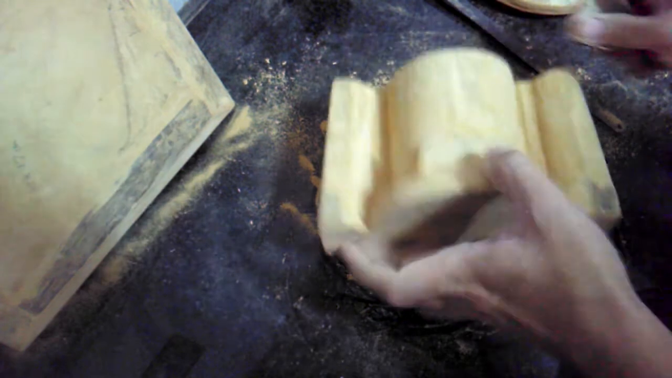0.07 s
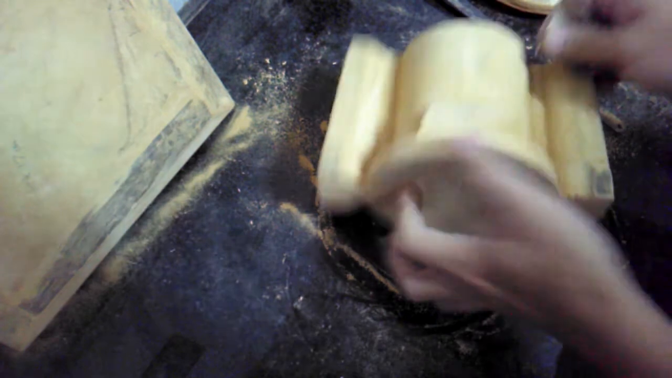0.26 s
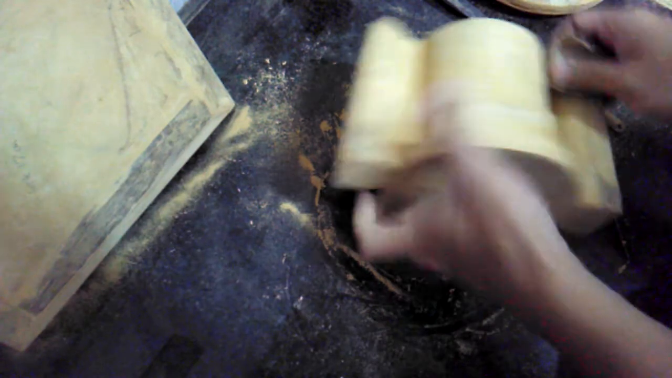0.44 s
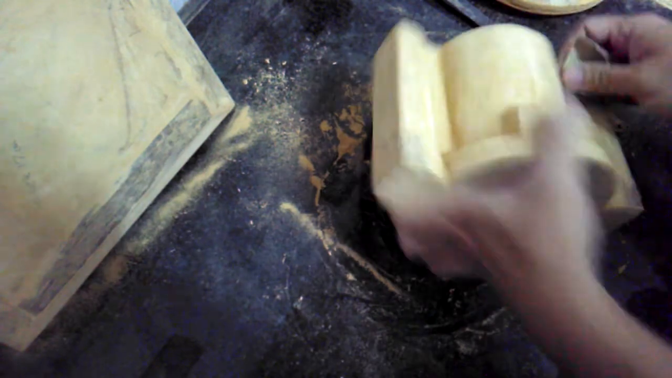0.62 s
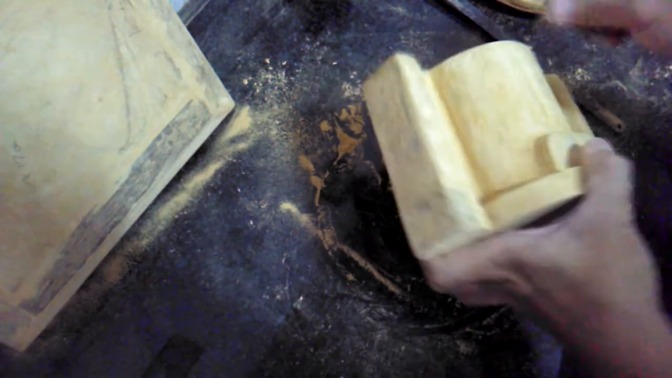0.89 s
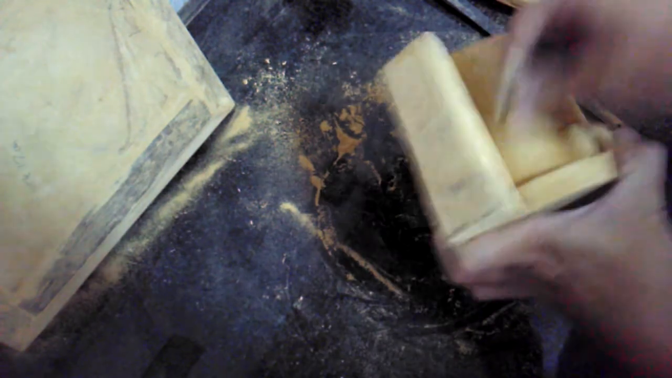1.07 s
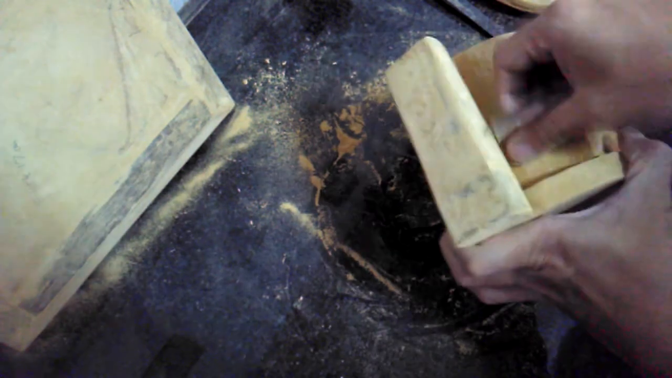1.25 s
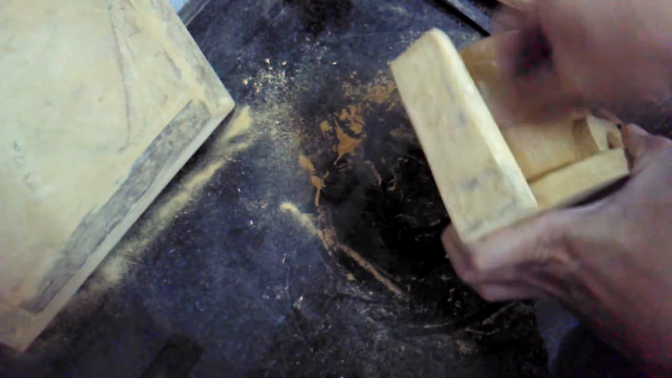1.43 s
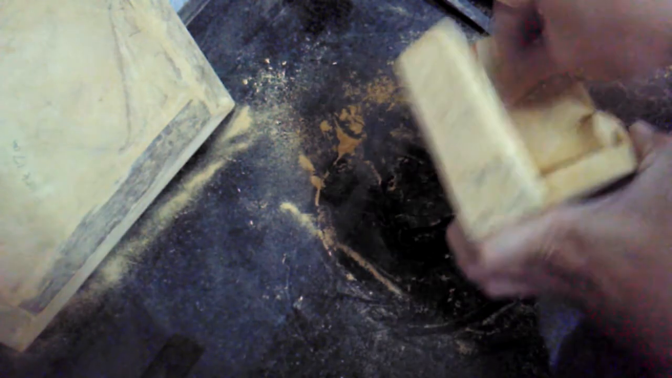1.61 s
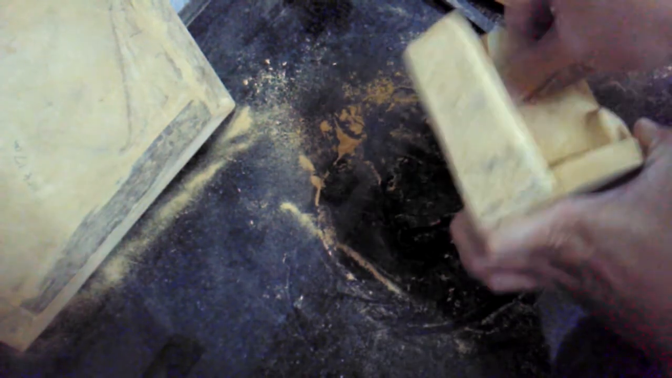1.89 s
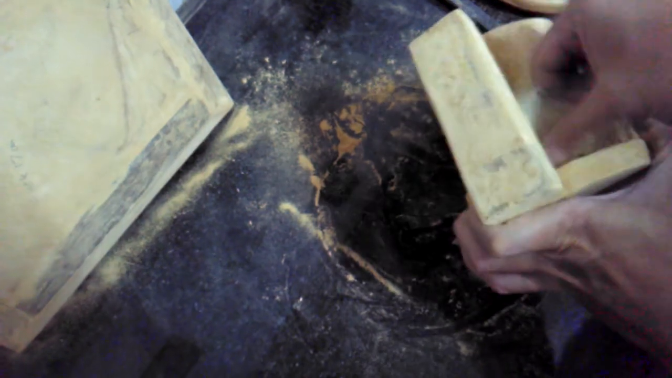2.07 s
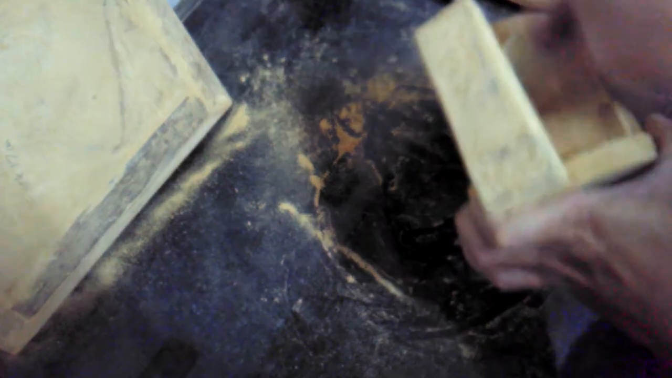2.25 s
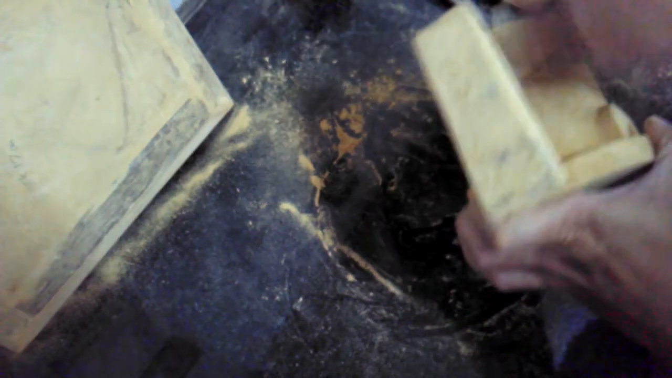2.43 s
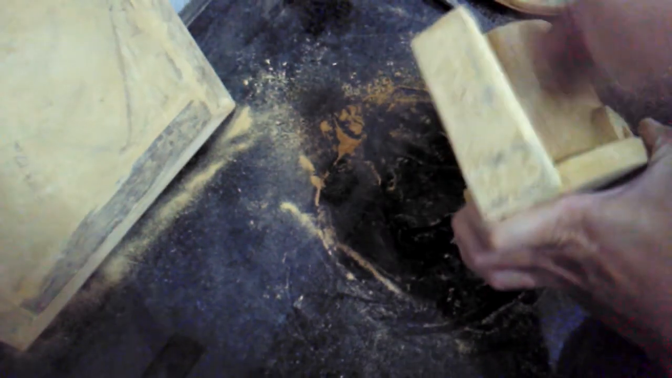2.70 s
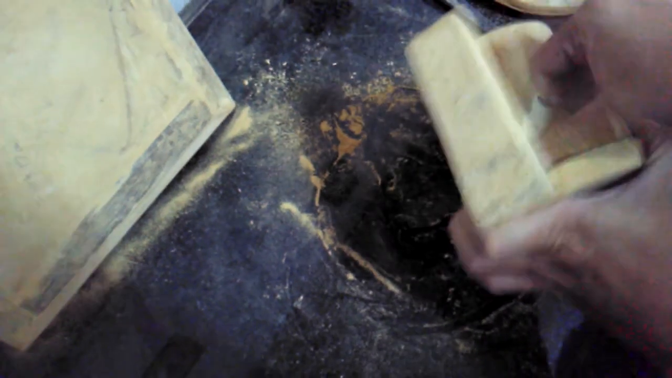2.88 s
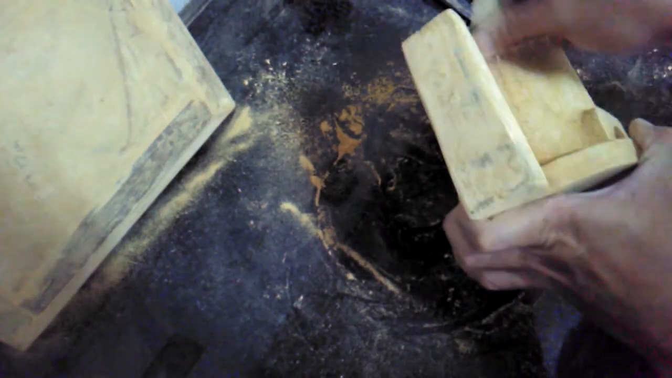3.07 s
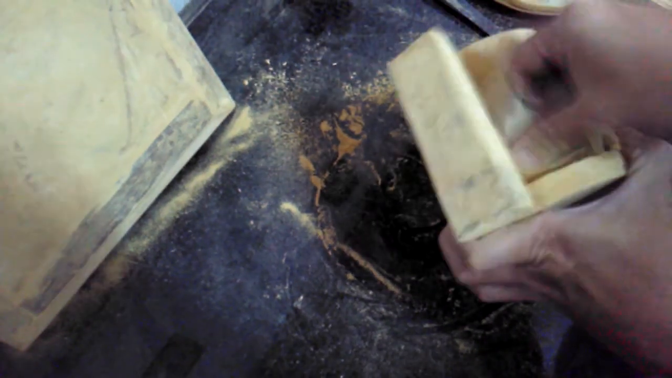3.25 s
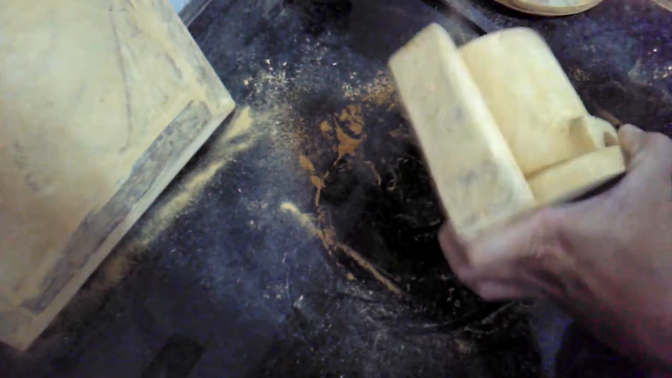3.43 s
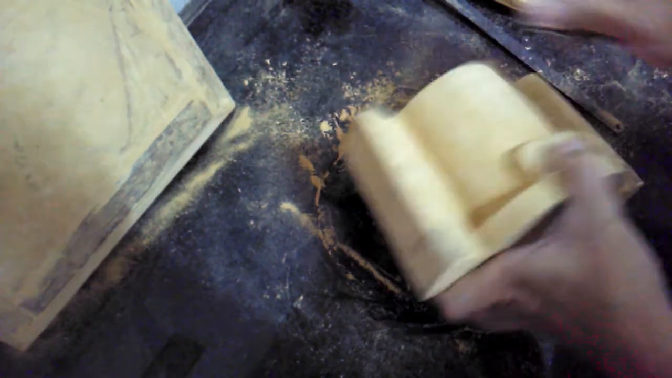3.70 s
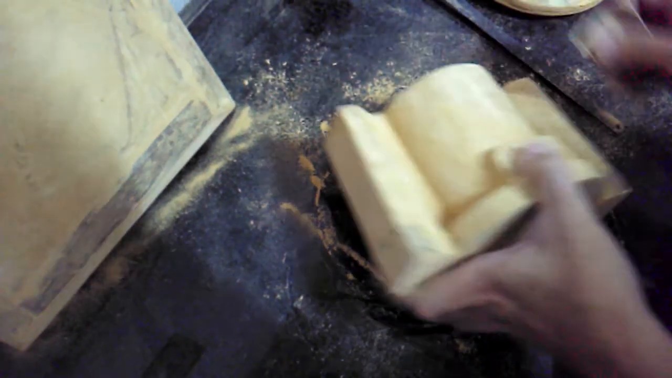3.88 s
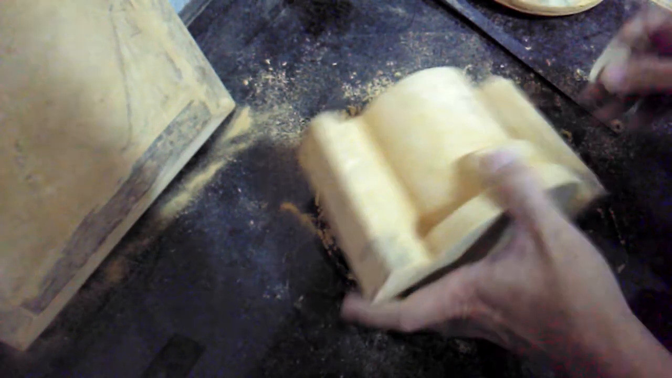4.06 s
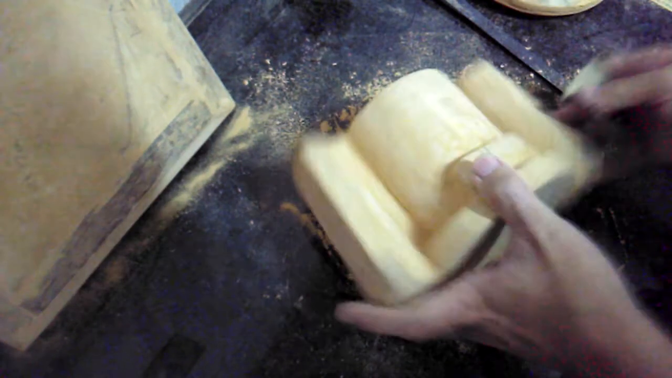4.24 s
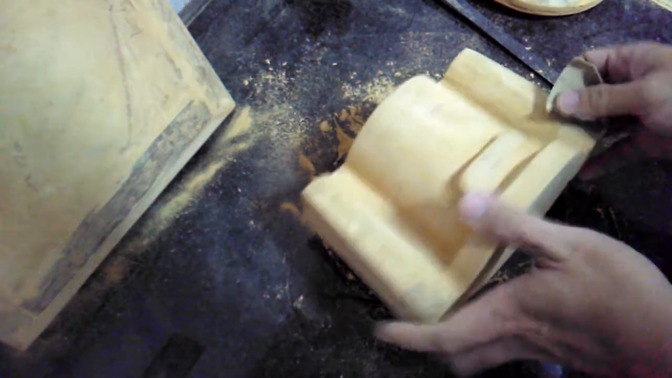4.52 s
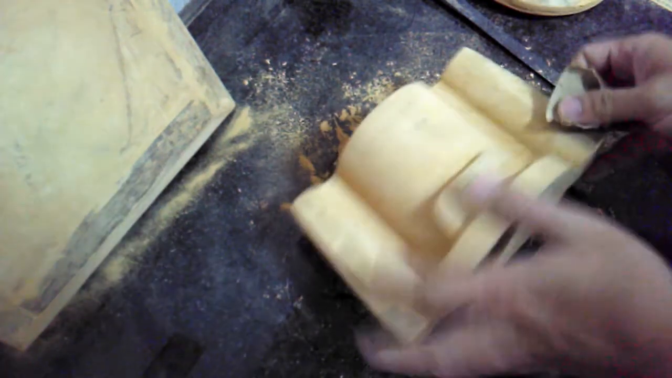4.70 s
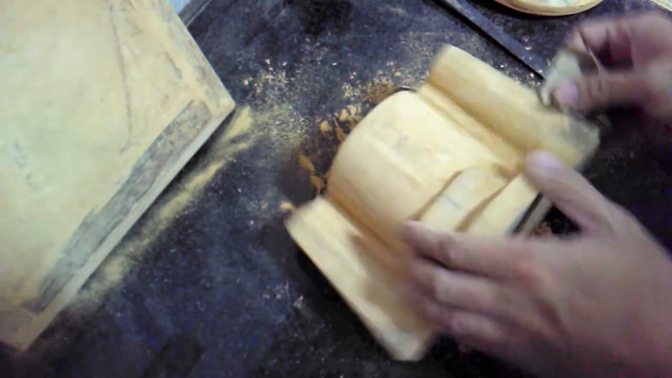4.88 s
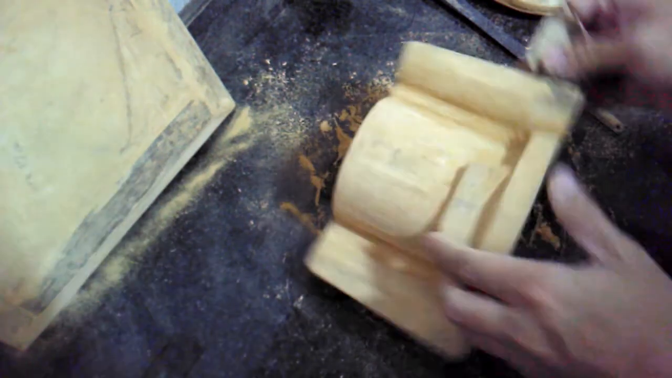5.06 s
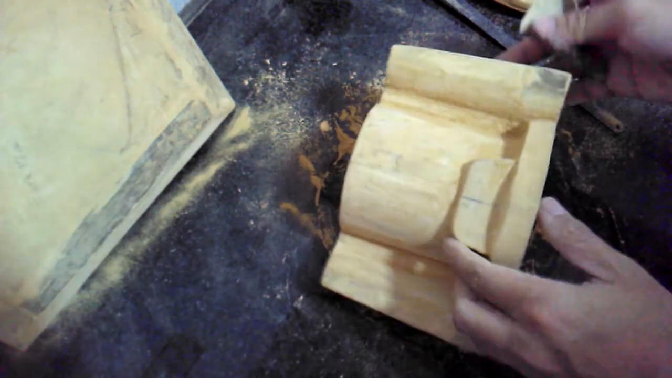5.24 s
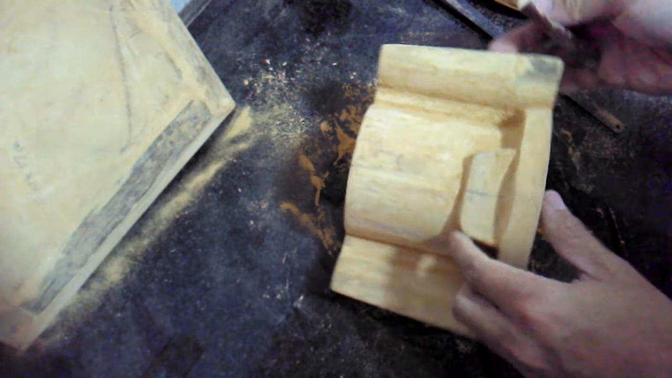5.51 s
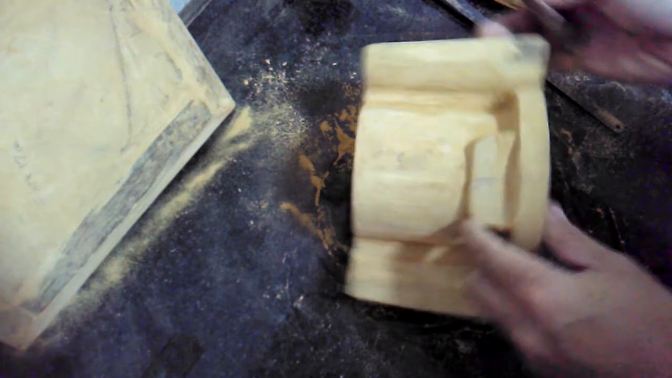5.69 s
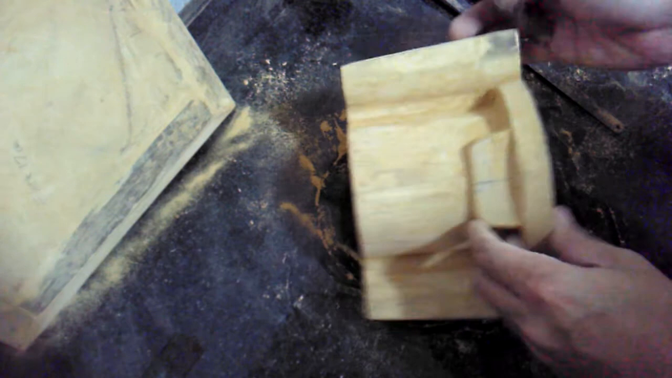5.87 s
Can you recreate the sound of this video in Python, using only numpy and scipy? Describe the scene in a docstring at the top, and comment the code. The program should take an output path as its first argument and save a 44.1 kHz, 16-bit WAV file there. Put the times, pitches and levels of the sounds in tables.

```python
"""At the bench a hollow wooden pattern is turned over: light rubs, and blunt knocks that ring wood and bench.
Paper snaps off an edge, then sixteen quick hand strokes rasp with grit, echoing off the wall of the hollow.
A last hard snap follows; the piece is set down and shifted with soft knocks and palm rubs as a faint drone swells.
A small workshop answers, over low rumble and hiss. The sound is close and almost central, with the scratch
and hiss spread a little in the treble."""
import sys
import numpy as np
from scipy import signal
from scipy.fft import rfft, irfft, next_fast_len
from scipy.io import wavfile
from scipy.ndimage import map_coordinates

SR = 44100
rng = np.random.default_rng(int(sys.argv[2]) if len(sys.argv) > 2 else 0)


def bounce(signal):
    """Save signal as a 16-bit WAV file at the path given by the first command-line argument."""
    frames = np.transpose(np.atleast_2d(signal))
    limited = np.clip(frames, -1, 1)
    pcm = np.round(limited * 32767).astype(np.int16)
    wavfile.write(sys.argv[1], SR, pcm)


N = 261495
TIME = np.arange(N) / SR  # seconds

# Sanding strokes, push and pull in turn. Each row: start in seconds, length in seconds,
# place of top speed from 0 to 1, gain in dB, wood under the rasp in dB.
STROKES = [(1.214, 0.084, 0.31, -59, 10.5), (1.383, 0.08, 0.4, -50.5, 5.5), (1.516, 0.078, 0.69, -42.5, 4),
           (1.644, .11, 0.45, -46.5, 3), (1.787, 0.1, 0.41, -44, 5), (1.915, .093, .55, -49, 6.5),
           (2.052, 0.084, 0.62, -42.5, 4), (2.17, 0.099, 0.65, -48, 5.5), (2.341, .074, 0.6, -44, 4.5),
           (2.459, 0.1, 0.6, -46, 5), (2.627, 0.11, 0.59, -42.5, 7.5), (2.758, .11, 0.59, -46, 7),
           (2.909, 0.094, 0.57, -41, 2), (3.036, 0.14, 0.47, -43.5, 5.5), (3.202, 0.13, 0.54, -40.5, -3),
           (3.356, 0.12, 0.71, -40.5, 1)]
# Grit on wood as the hand pushes. Each row: frequency in Hz, relative level in dB per Hz.
PUSH_TONE = [(350, -54), (600, -29.5), (905, -20.5), (1120, -20.5), (1350, -17), (1950, -10), (2320, -10),
             (3370, -7.5), (3790, -0.5), (4160, -5), (4880, -1), (7080, -14), (7660, -19), (12700, -25),
             (14300, -33)]
# Grit on wood as the hand pulls. Each row: frequency in Hz, relative level in dB per Hz.
PULL_TONE = [(350, -19.5), (600, -24.5), (1090, -11), (1180, -13), (1930, -9), (2290, -6.5), (2620, -7),
             (2910, 0), (3500, -4), (3790, 0.5), (4220, -1.5), (4950, 1), (6890, -12), (12900, -21),
             (14300, -28)]
# Resonances of the piece under the paper. Each row: frequency in Hz, width in Hz, lift in dB.
WALL_RESONANCES = [(1227, 45, 1), (2326, 320, 6), (3000, 220, 3.5), (3680, 180, -1.5), (4330, 260, -1.5),
                   (4840, 130, 3.5)]
# The paper catches and snaps. Each row: start in seconds, gain in dB, t60 in seconds, wood body in dB.
SNAPS = [(1.0064, -45, 0.044, -19), (1.023, -51.5, 0.14, -19), (1.643, -43, 0.044, -20),
         (3.4527, -29, 0.039, 0.5), (3.574, -59, 0.033, -12), (4.4423, -59, 0.18, -9)]
# The flick of the paper itself. Each row: frequency in Hz, relative level in dB per Hz.
SNAP_TONE = [(600, -23), (1700, -12), (2500, 5), (3100, -8), (3800, -19), (4500, -7), (5200, -0.5),
             (5900, -20), (6600, -15.5), (8000, -28.5), (14000, -30)]
# The hollow wood under a snap. Each row: frequency in Hz, relative level in dB per Hz.
HOLLOW_TONE = [(400, -19.5), (700, -14), (1050, -2.5), (1400, -3.5), (1850, 2), (2500, 1), (3200, -3.5),
               (5000, -26)]
# The piece meets the bench. Each row: start in seconds, gain of the piece in dB,
# contact bandwidth in Hz, gain of the bench in dB.
KNOCKS = [(.002, -59, 745, -58.5), (.6225, -44.5, 466, -46), (0.636, -44, 270, -52),
          (0.656, -59, 800, -47.5), (0.673, -68, 600, -59), (0.6954, -40.5, 660, -46.5),
          (.816, -29, 860, -30.5), (0.8272, -35, 640, -41), (3.8366, -47, 414, -78),
          (4.148, -40, 367, -52.5), (5.067, -43.5, 473, -45), (5.092, -47, 343, -50.5),
          (5.1237, -45, 357, -50.5)]
# Modes of the piece. Each row: frequency in Hz, relative level in dB, t60 in seconds.
WOOD_MODES = [(169.5, -5, .15), (219, 5.5, 0.02), (265, -0.5, 0.1), (329.3, -1, 0.12), (360.9, -6.5, 0.32),
              (407.2, -4, 0.25), (472, 1, 0.084), (529, -10.5, 0.27), (640, -2.5, 0.15), (720, -6, 0.15),
              (790, -12, 0.15), (888, 2, 0.048), (1015, -17.5, 0.059), (1160, -17, 0.32)]
# Modes of the bench top. Each row: frequency in Hz, relative level in dB, t60 in seconds.
BENCH_MODES = [(72.6, 8.5, 0.24), (94.4, -26, .14), (134, 11, 0.092)]
# Dust crushed by a blow. Each row: frequency in Hz, relative level in dB per Hz.
CRUNCH_TONE = [(420, 13), (820, 14), (1120, 13.5), (1380, 4.5), (2050, -2.5), (2950, -5.5), (3750, -15),
               (5100, -12.5), (6400, -32), (13500, -37)]
# Light rubs in handling. Each row: start in seconds, length in seconds,
# gain in dB before the common trim, what rubs.
RUBS = [(.025, .19, -69.5, "paper"), (0.217, .065, -55, "paper"), (.3, 0.087, -71, "paper"),
        (.652, 0.014, -67.5, "slide"), (3.5, 0.061, -66.5, "paper"), (4.113, 0.028, -69.5, "palm"),
        (4.258, 0.057, -70, "palm"), (4.425, 0.049, -68, "palm"), (4.525, .28, -71.5, "palm"),
        (4.61, .03, -69.5, "palm"), (4.809, 0.062, -57.5, "palm"), (4.97, 0.055, -72.5, "palm"),
        (5.674, 0.12, -62.5, "slide")]
# Rustle of the held paper. Each row: frequency in Hz, relative level in dB per Hz.
PAPER_TONE = [(590, -66.5), (1000, -25), (1670, -2.5), (1920, -18), (2260, -1), (2460, -6), (2960, -9.5),
              (3330, -22), (3620, 1), (4120, -8.5), (4900, 3), (6000, -10), (6680, -18.5), (8460, -18),
              (13000, -34)]
# Brush of a palm on the wood. Each row: frequency in Hz, relative level in dB per Hz.
PALM_TONE = [(410, -45), (700, -15), (986, 0), (1210, -28), (1320, -13), (1950, -9.5), (2180, -6.5),
             (2560, -9), (2890, -8.5), (3270, -11), (3920, -7.5), (4330, -11), (5660, -9), (6800, -19),
             (13000, -29)]
# The piece sliding round. Each row: frequency in Hz, relative level in dB per Hz.
SLIDE_TONE = [(590, -48), (1000, -23.5), (1130, -28), (1170, -38), (1570, -9), (2160, -2.5), (2290, -9),
              (2430, -22), (2860, -3), (3150, -18), (3970, -14.5), (4670, -21), (6480, -18), (7490, -29),
              (10000, -29), (13000, -52), (22000, -120)]
# Swells of the drone. Each row: middle in seconds, half width in seconds, gain in dB before the common trim.
DRONE_SWELLS = [(5.34, 0.081, -51.5), (5.64, 0.11, -50.5), (5.93, 0.07, -51)]
# Lines of the drone. Each row: frequency in Hz, relative level in dB.
DRONE_LINES = [(187, -2.5), (242, 5), (283, -4.5)]
# Steady noise of the workshop. Each row: frequency in Hz, relative level in dB per Hz.
FLOOR_TONE = [(15, -36), (25, -2.5), (92, 0), (144, -4), (183, -9), (259, -14), (338, -20.5), (606, -23.5),
              (674, -29.5), (730, -27), (1210, -36), (2480, -38.5), (2900, -41.5), (3320, -40.5),
              (14300, -50.5)]
# Decay of the room. Each row: frequency in Hz, t60 in seconds.
ROOM_DECAY = [(110, 0.57), (420, 0.46), (1600, 0.39), (5100, 0.37), (12500, 0.47)]
# Spread of the treble. Each row: frequency in Hz, side against the scratch and hiss of the mid in dB.
WIDTH = [(3600, -80), (4200, -65), (5000, -49), (6000, -16), (7500, -6), (9200, -5), (10500, -6.5),
         (14000, -9.5)]

PUSH_BITE, PULL_BITE = 0.46, 0.91  # how hard the paper catches as the hand turns round (0-1)
USUAL_DB = -45.5  # a stroke of ordinary pressure
BRIGHT_DB, BRIGHT_RISE = 1.6, 0.25  # tilt to the upper resonances, and dB it gains per dB of pressure
# finest fizz: a stroke twice as quick as usual has this much more
FIZZ_DB, FIZZ_PER_OCTAVE_DB, USUAL_LENGTH_S = -1.3, 2.5, 0.087
USUAL_CONTACT_HZ = 469  # a blow of ordinary hardness
THUD_DB, THUD_PER_OCTAVE_DB = -0.5, -10.5  # harder blows thump the bench less
CRUNCH_DB, CRUNCH_PER_OCTAVE_DB = -8.5, 5  # and crush more dust
# dead bump over the ring: level, usual pitch, octaves it rises per octave of contact bandwidth
BUMP_DB, BUMP_HZ, BUMP_RISE = 18.5, 270, 0.68
RUB_ATTACK_S, RUB_RELEASE_S, RUB_TRIM_DB = 0.014, 0.037, -1.36  # time constants, common trim
# the drone sinks by this share a second; its lines are given for the middle moment
DRONE_SAG_PER_S, DRONE_MIDDLE_S, DRONE_TRIM_DB = 0.07, 5.5, -3.5
RUMBLE_DB, HISS_DB = -60, -56.5  # gains of the steady floor
TOP_HZ = 14350  # upper band limit


def sanding(fizz_hz=7200, body_hz=1500, bright_hz=4300, near_s=0.001157, travel_s=0.00054,
            echo=0.19, creep=0.15, grab_s=0.0027):
    """Each stroke creeps, bites, speeds up and stops; faster paper breaks more grit, louder and brighter."""
    out = np.zeros(N)
    t = np.arange(-0.04, 0.2, 1 / SR)
    for k, (start, length, top, db, body_db) in enumerate(STROKES):
        pulling = k % 2
        tone, bite = (PULL_TONE, PULL_BITE) if pulling else (PUSH_TONE, PUSH_BITE)
        bright_db = BRIGHT_DB + BRIGHT_RISE * (db - USUAL_DB)
        fizz_db = FIZZ_DB + FIZZ_PER_OCTAVE_DB * np.log2(USUAL_LENGTH_S / length)

        # the hand's way through the stroke, warped to put top speed in its place
        u = np.clip(t / length, 0, 1)
        warped = u * (1 - top) / (u * (1 - top) + (1 - u) * top)
        speed = np.abs(np.sin(np.pi * warped))
        grab = 1 - np.exp(-u * length / grab_s)
        work = (speed + bite * (1 - u) ** 2) * grab + creep * np.exp(-(t / 0.023) ** 2)

        fractures = grit(6000 + 14000 * speed, spread_db=1.8)
        rasp = coloured(fractures, tone)
        # the wall of the hollow reflects the rasp with a delay that follows the hand
        distance = 1 - u if pulling else u
        delay = (near_s + travel_s * distance) * SR
        rasp = rasp + echo * map_coordinates(rasp, [np.arange(len(t)) - delay])
        # pressure tilts the balance between the lower and upper resonances
        rasp = filtered(rasp, lambda hz: amp(
            wall_lift(hz) + bright_db / 2 * np.tanh((hz - bright_hz) / 500)))
        rasp = cupped(rasp, depth_db=1.8)

        # work drives the fizz most and the wood body least
        body = filtered(rasp, lambda hz: 1 / (1 + (hz / body_hz) ** 6))
        fizz = filtered(rasp, lambda hz: 1 - 1 / (1 + (hz / fizz_hz) ** 8))
        stroke = (rasp - body - fizz) * work ** 0.73
        stroke += amp(body_db) * body * work ** 0.46
        stroke += amp(fizz_db) * fizz * work ** 0.96
        add(out, start + t[0], amp(db) * stroke)
    return out * amp(0.55 * wobble(130))  # the paper grips unevenly


def wall_lift(hz):
    """Lift in dB where the walls of the piece resonate under the paper."""
    return sum(db / (1 + (2 * (hz - centre) / width) ** 2) for centre, width, db in WALL_RESONANCES)


def snaps():
    """The stiff paper flicks over an edge; a hard catch also sounds the hollow wood."""
    out, t = np.zeros(N), np.arange(SR // 6) / SR
    for s, db, t60, body_db in SNAPS:
        paper, wood = rng.standard_normal((2, len(t)))
        flick = coloured(paper, SNAP_TONE) + amp(body_db) * coloured(wood, HOLLOW_TONE)
        add(out, s, flick * amp(db - 60 * t / t60) * onset(t, 0.0008))
    return out


def knocks(bump_t60=0.023, crunch_t60=0.13):
    """Blows bump and ring the piece, thump the bench, crush dust; a softer contact is lower and duller."""
    out, t = np.zeros(N), np.arange(SR // 2) / SR
    for s, piece_db, contact_hz, bench_db in KNOCKS:
        hardness = np.log2(contact_hz / USUAL_CONTACT_HZ)  # octaves
        thud_db = THUD_DB + THUD_PER_OCTAVE_DB * hardness
        crunch_db = CRUNCH_DB + CRUNCH_PER_OCTAVE_DB * hardness
        contact = signal.butter(4, contact_hz, fs=SR)
        wood = signal.lfilter(*contact, ring(WOOD_MODES, t, scatter_db=1.5))
        bump_hz = BUMP_HZ * 2 ** (BUMP_RISE * hardness)
        bump = np.sin(2 * np.pi * bump_hz * t) * amp(BUMP_DB - 60 * t / bump_t60) * onset(t, 0.002)
        thud = amp(thud_db) * ring(BENCH_MODES, t, scatter_db=1.5) * onset(t, 0.0079)
        dust = coloured(rng.standard_normal(len(t)), CRUNCH_TONE)
        crunch = dust * amp(crunch_db - 60 * t / crunch_t60) * onset(t, 0.0008)
        add(out, s, amp(piece_db) * (wood + bump) + amp(bench_db) * (thud + crunch))
    return out


def handling():
    """Paper rustles, a palm brushes the wood, the piece slides: each rub of grit rises, holds and dies away."""
    out = np.zeros(N)
    for surface, tone in [("paper", PAPER_TONE), ("palm", PALM_TONE), ("slide", SLIDE_TONE)]:
        touch = np.zeros(N)
        for start, length, db, what in RUBS:
            if what == surface:
                before = np.maximum(start - TIME, 0)
                after = np.maximum(TIME - start - length, 0)
                rub = amp(db) * np.exp(-before / RUB_ATTACK_S - after / RUB_RELEASE_S)
                touch = np.maximum(touch, rub)
        fractures = grit(np.full(N, 4500), spread_db=2)
        out += touch * cupped(coloured(fractures, tone), depth_db=6.0)
    return out * amp(RUB_TRIM_DB + 0.98 * wobble(70))


def drone():
    """A few low, wavering lines swell and fade twice, then swell again at the end, as they slowly sink."""
    # a clock that slows steadily lowers every line together
    clock = TIME - DRONE_SAG_PER_S / 2 * (TIME - DRONE_MIDDLE_S) ** 2
    lines = np.zeros(N)
    for hz, db in DRONE_LINES:
        level = amp(db + 2.1 * wobble(6.4))
        lines += level * np.sin(2 * np.pi * hz * clock + 0.77 * wobble(15))
    swells = sum(amp(db) * np.exp(-((TIME - s) / width) ** 2) for s, width, db in DRONE_SWELLS)
    return amp(DRONE_TRIM_DB) * swells * unit(lines)


def background():
    """Shaped noise: low workshop rumble that wavers in level under a thin, even hiss."""
    air = coloured(rng.standard_normal(N), FLOOR_TONE)
    low = filtered(air, lambda hz: 1 / (1 + (hz / 300) ** 4))
    swell = amp(1.2 * wobble(9))
    return amp(RUMBLE_DB) * swell * unit(low) + amp(HISS_DB) * (air - low)


def workshop(x):
    """The room's answer: a tail of noise in which each frequency dies at its own speed."""
    hz, t, z = signal.stft(rng.standard_normal(SR // 2), SR, nperseg=256)
    decay = amp(-60 * t / along(ROOM_DECAY, hz)[:, None])
    tail = signal.istft(z * decay, SR, nperseg=256)[1]
    gap = np.zeros(round(0.005 * SR))  # before the first reflection
    return signal.fftconvolve(x, np.r_[gap, tail / np.linalg.norm(tail)])[:N]


def standing_wave(x, mode_hz=336, quality=14, delay_s=0.0435):
    """One low resonance of the room builds up late and hums on after a blow."""
    hum = signal.lfilter(*signal.iirpeak(mode_hz, quality, fs=SR), x)
    hum = signal.lfilter(*signal.iirpeak(mode_hz, quality / 2, fs=SR), hum)
    return np.r_[np.zeros(round(delay_s * SR)), hum][:N]


def amp(db):
    """Amplitude ratio of a level in dB."""
    return 10 ** (np.asarray(db) / 20)


def unit(x):
    """The sound at rms 1."""
    return x / np.sqrt(np.mean(x ** 2) + 1e-20)


def along(points, hz):
    """Value at hz between (Hz, value) points on a log axis."""
    f, v = np.transpose(points)
    return np.interp(np.log(hz + 1), np.log(f), v)


def wobble(rate):
    """A smooth random curve, rate knots a second."""
    knots = rng.standard_normal(int(N * rate / SR) + 4)
    return map_coordinates(knots, [TIME * rate])


def filtered(x, response):
    """The spectrum of x times a response of frequency."""
    n = x.shape[-1]
    m = next_fast_len(n + 8192)  # padded so that the end does not wrap round
    return irfft(rfft(x, m) * response(np.fft.rfftfreq(m, 1 / SR)), m)[..., :n]


def coloured(x, spectrum):
    """x through an (Hz, dB) spectrum, at rms 1."""
    return unit(filtered(x, lambda hz: amp(along(spectrum, hz))))


def add(track, s, sound):
    """Mix a sound into the track at s seconds."""
    start = max(round(s * SR), 0)
    track[start:start + len(sound)] += sound[:N - start]


def onset(t, rise_s):
    """Rise from silence with a time constant of rise_s seconds."""
    return 1 - np.exp(-t / rise_s)


def grit(rate, spread_db):
    """Tiny fractures of very unequal size, rate a second (one value per sample)."""
    n = len(rate)
    breaks = rng.random(n) < rate / SR
    return unit(breaks * rng.standard_normal(n) * amp(spread_db * rng.standard_normal(n)))


def ring(modes, t, scatter_db):
    """Damped modes, met at new strengths and phases by every blow."""
    hz, db, t60 = np.transpose(modes)[:, :, None]
    gain = amp(db + scatter_db * rng.standard_normal(hz.shape) - 60 * t / t60)
    return np.sum(gain * np.sin(2 * np.pi * (hz * t + rng.random(hz.shape))), axis=0)


def cupped(x, depth_db):
    """Moving fingers cup the sound: narrow bands swell and fade at random."""
    z = signal.stft(x, nperseg=512)[2]
    # one random knot for every 3 bands and 8 frames, smoothly joined
    field = rng.standard_normal((z.shape[0] // 3 + 2, z.shape[1] // 8 + 2))
    patches = map_coordinates(field, np.mgrid[:z.shape[0], :z.shape[1]] / [[[3]], [[8]]])
    return unit(signal.istft(z * amp(depth_db * patches), nperseg=512)[1][:len(x)])


def spread(mid, grains):
    """The treble of separate grains, added on the left and taken away on the right, spreads the sound a little."""
    side = filtered(grains, lambda hz: amp(along(WIDTH, hz)))
    return np.array([mid + side, mid - side])


def hissing():
    """All that scratches, with the room's answer, over the background."""
    scratch = sanding() + snaps() + handling()
    return scratch + amp(-12.5) * workshop(scratch) + background()


def scene():
    """Close scratching and blows, the room behind them, and the drone; separate grains spread the treble."""
    blows = knocks()
    room = amp(-13.0) * workshop(blows) + amp(1.0) * standing_wave(blows)
    mid = hissing() + blows + room + drone()
    return spread(mid, hissing())


def record(dry):
    """The deepest bass is rolled off and nothing is kept above the band limit."""
    thin = signal.lfilter(*signal.butter(3, 42, "high", fs=SR), dry)
    return filtered(thin, lambda hz: hz < TOP_HZ)


dry = scene()
out = record(dry)
bounce(out)
```